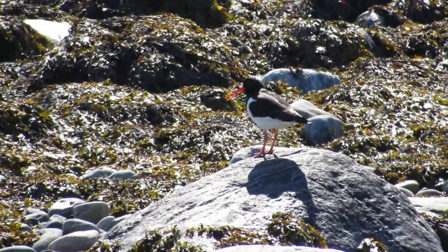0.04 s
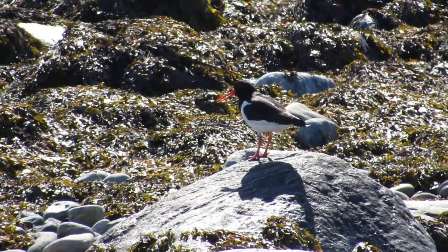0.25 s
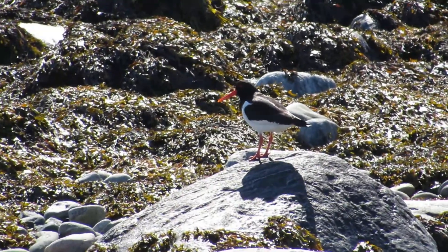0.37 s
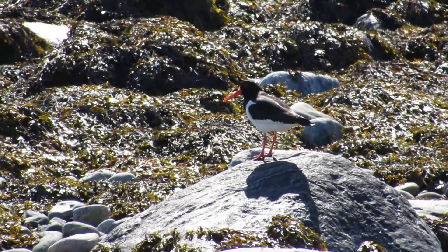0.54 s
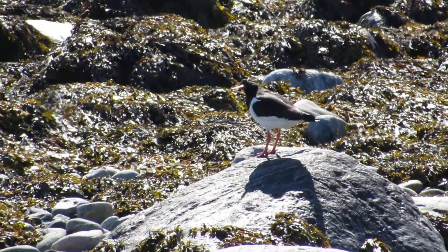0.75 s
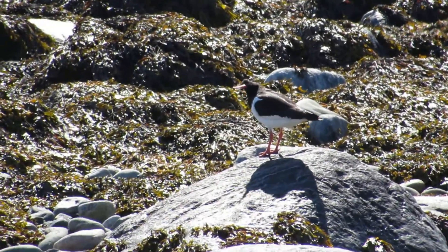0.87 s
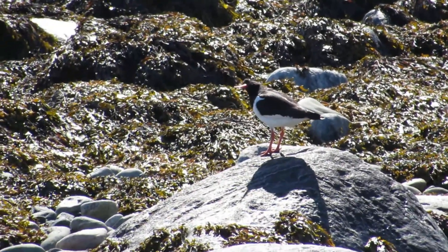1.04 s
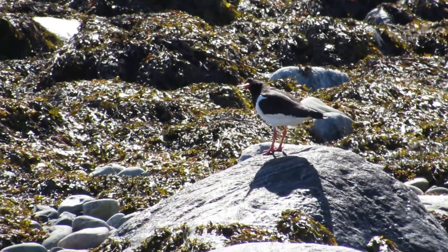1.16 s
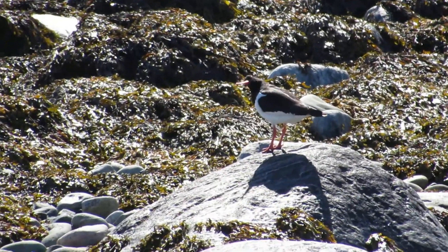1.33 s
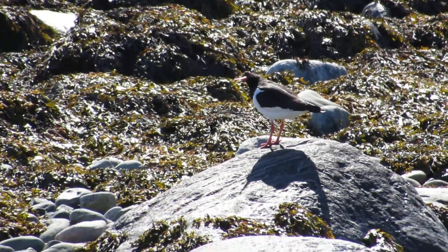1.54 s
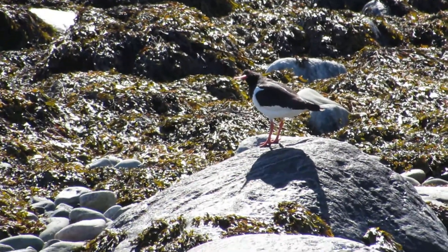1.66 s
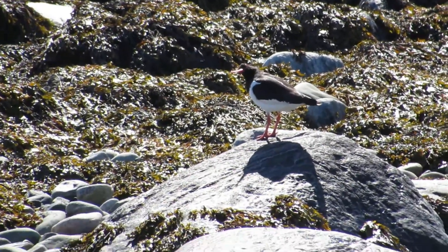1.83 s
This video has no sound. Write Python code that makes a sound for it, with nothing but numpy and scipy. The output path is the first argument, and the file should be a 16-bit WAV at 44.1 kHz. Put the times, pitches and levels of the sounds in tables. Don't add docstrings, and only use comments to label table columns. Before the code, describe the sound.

Over soft hissing surf and low uneven wind thumps on a camera's microphone pair, a nearby shorebird peeps once, bright and clear; afterwards only wash, small gurgles and drips among stones remain on the open rocky shore.

```python
import sys
import numpy as np
from scipy import signal
from scipy.fft import rfft, irfft
from scipy.io import wavfile
from scipy.ndimage import uniform_filter1d

SR = 44100
rng = np.random.default_rng(int(sys.argv[2]) if len(sys.argv) > 2 else 0)


def generate_wav(sig):
    pcm = np.round(np.clip(np.atleast_2d(sig).T, -1, 1) * 32767).astype(np.int16)
    wavfile.write(sys.argv[1], SR, pcm)


def voltage_ratio(level):
    return 10 ** (np.asarray(level, float) / 20)


N = 83790
SIDE = np.array([[.5], [-.5]])


def evened(x):
    return x / np.sqrt(np.mean(x ** 2) + 1e-20)


def steadied(x, seconds):
    size = round(seconds * SR)
    power = uniform_filter1d(uniform_filter1d(x ** 2, size), size)
    return x / np.sqrt(abs(power))


def read(points, hz):
    f, value = np.transpose(points)
    return np.interp(np.log(hz + 1), np.log(f + 1), value)


def drift(seconds, shape):
    size = max(round(seconds * SR), 1)
    noise = rng.standard_normal(shape)
    return evened(uniform_filter1d(uniform_filter1d(noise, size), size))


def coloured(x, gain):
    return irfft(rfft(x) * gain(np.fft.rfftfreq(N, 1 / SR)), N)


def bubble(hz, length, rise):
    u = np.arange(0, 1, 1 / (length * SR))
    cycles = hz * length * (u + (rise - 1) * u ** 2 / 2)
    swell_and_fade = np.sin(np.pi * u ** .6) ** 2
    return np.sin(2 * np.pi * cycles) * swell_and_fade


# (frequency [Hz], level per Hz [dB])
SURF_COLOUR = [(250, 0), (500, -4.5), (2650, -12), (4500, -16.5), (7000, -20.5), (11600, -27), (13600, -34),
               (15000, -42)]
# (time [s], level [dB])
SWELL = [
    (0.0, -58.5),
    (0.672, -52.5),
    (0.792, -50.5),
    (1.122, -49.5),
    (1.56, -53.5),
    (1.9, -53.5),
]
# (frequency [Hz], share [ratio])
SWELL_SHARE = [(300, 0.6), (800, 0.99), (2000, 1.0), (5000, 0.43), (12000, 0.18)]
# (frequency [Hz], correlation [-1 to 1])
LIKENESS = [(250, -0.79), (540, -0.68), (1100, -0.38), (2300, 0.049), (4800, 0.26), (7000, 0.068),
            (14500, -0.12)]
# (frequency [Hz], left-right difference [dB])
SURF_LEAN = [(60, -1.0), (150, -8), (370, -1.5), (930, 1.5), (2330, 4), (5810, -0.5), (14500, 1)]
# (centre [Hz], width [Hz], level [dB])
HOLLOWS = [(762, 118, -53), (932, 530, -54), (1730, 390, -60.5), (4980, 470, -71)]


def surf():
    surf_db, patch_db, flicker_db, hollow_steady_s = -45.5, 1.94, 0.38, 0.052
    frames, hz = N // 128 + 5, np.fft.rfftfreq(512, 1 / SR)
    hz[0] = 1
    a, b, c, d, e, f, patches, flicker = rng.standard_normal((frames, 257, 8)).T
    patches = evened(uniform_filter1d(uniform_filter1d(patches, 6, 0), 16, 1))
    flicker = evened(uniform_filter1d(flicker, 40, 0))
    s, db = np.transpose(SWELL)
    swell = np.interp(np.arange(frames) * 128 / SR, s, db - np.mean(db))
    field_db = read(SWELL_SHARE, hz)[:, None] * swell + patch_db * patches + flicker_db * flicker
    same = np.clip(read(LIKENESS, hz), -1, 1)[:, None]
    left = a + 1j * b
    right = same * left + np.sqrt(1 - same ** 2) * (c + 1j * d)
    spectra = np.array([left, right, e + 1j * f]) * voltage_ratio(field_db)
    left, right, centre = signal.istft(spectra, nperseg=512, noverlap=384)[1][:, :N]

    def wash(noise, side):
        def gain(f):
            low_cut = 1 + (200 / (f + 1)) ** 4
            return voltage_ratio(read(SURF_COLOUR, f) + side * read(SURF_LEAN, f)) / low_cut
        return coloured(noise, gain)

    wide = np.array([wash(left, .5), wash(right, -.5)])
    hollow = 0
    for centre_hz, width, db in HOLLOWS:
        ring = coloured(centre, lambda f: 1 / (1 + (2 * (f - centre_hz) / width) ** 2))
        hollow = hollow + voltage_ratio(db) * steadied(ring, hollow_steady_s)
    return voltage_ratio(surf_db) * evened(wide) + hollow


# (frequency [Hz], level per Hz [dB])
WIND_COLOUR = [(8.8, -53), (15, -6), (43, 0.5), (70, 2), (162, -12), (193, -11), (247, -19.5), (280, -22.5),
               (400, -34), (520, -72), (880, -120)]
# (time [s], level [dB])
GUSTS = [(0, -31.5), (.1, -39), (.19, -29.5), (.26, -32.5), (.33, -34.5), (.5, -31), (.58, -38.5),
         (.66, -33.5), (.79, -38), (.84, -40.5), (.96, -39.5), (1.01, -32.5), (1.11, -37), (1.18, -39.5),
         (1.44, -36), (1.64, -38.5), (1.72, -43.5), (1.9, -38.5)]


def wind():
    lumps_db, lump_s, steady_s = 1, 0.045, 0.057
    common_db, lean_db, lag_s = -14, -0.8, .00005
    s, db = np.transpose(GUSTS)
    noise = rng.standard_normal((2, N)) * voltage_ratio(lumps_db * drift(lump_s, N))
    noise = coloured(noise, lambda f: voltage_ratio(read(WIND_COLOUR, f)) / (1 + (f / 450) ** 4))
    strength = voltage_ratio(np.interp(np.arange(N) / SR, s, db))
    across, common = steadied(noise, steady_s) * strength
    common = voltage_ratio(common_db) * common
    left = np.roll(common + across, round(lag_s * SR))
    right = common - across
    return np.array([left, right]) * voltage_ratio(lean_db * SIDE)


# (time [s], level [dB], pitch [Hz], length [s], pitch rise [ratio])
DRIPS = [(.0325, -42, 5200, .0025, 1.01), (.169, -43, 5000, .005, 1.01), (.462, -46, 2150, .005, 1.1),
         (.6205, -35, 740, .014, 1.1), (.648, -46, 2300, .004, 1.05), (.648, -46, 5100, .002, 1.1),
         (.684, -39, 950, .012, 1.3), (.847, -42, 1050, .01, 1.1), (.887, -43, 2400, .002, 1.05),
         (.957, -47, 5200, .003, 1.01), (.978, -40, 1600, .002, 1.3), (1.009, -41, 2400, .003, 1.05),
         (1.032, -40, 860, .025, 1.08), (1.06, -53, 1500, .04, 1.25), (1.075, -46, 1060, .02, 1.02),
         (1.09, -37, 760, .04, .93), (1.115, -45, 1100, .02, 1.02), (1.3903, -28, 1750, .0026, .45),
         (1.3912, -41, 5400, .0018, 1.01), (1.3925, -35, 700, .01, .9), (1.389, -45, 330, .012, .9),
         (1.4515, -45, 4400, .004, 1.01), (1.475, -47, 4400, .005, 1.01)]


def trickle():
    fizz_per_s, fizz_db, fizz_spread_db = 880, -61, 7.5
    lean_db, lead_rad = 6.5, 0.73
    out = np.zeros(N)
    size = voltage_ratio(fizz_spread_db * np.minimum(rng.exponential(1, N), 4))
    size *= rng.random(N) < fizz_per_s / SR
    kind, shape = rng.integers(0, 24, N), rng.random((24, 2))
    for k, hz in enumerate(np.geomspace(850, 6000, 24)):
        length, rise = (4 + 8 * shape[k, 0]) / hz, 1 + 0.14 * shape[k, 1]
        grain = bubble(hz, length, rise) * (700 / hz) ** 0.32
        out += signal.oaconvolve(size * (kind == k), grain)[:N]
    out = voltage_ratio(fizz_db) * evened(out)
    for s, db, hz, length, rise in DRIPS:
        drop = voltage_ratio(db) * bubble(hz, length, rise)
        out[round(s * SR):][:len(drop)] += drop
    return (signal.hilbert(out) * voltage_ratio(lean_db * SIDE) * np.exp(1j * lead_rad * SIDE)).real


# (time [s], pitch [Hz], effort [dB], bill opening [dB])
CALL = [
    (.2312, 2696, -32, -27),
    (0.248, 2800, -36.5, -22.5),
    (0.259, 3055, -21, -1),
    (0.267, 3182, -20.5, -0.5),
    (.275, 3251, -19.5, -5),
    (.282, 3110, -19.5, -0.5),
    (0.291, 2845, -32, -6.5),
    (0.302, 2620, -34, -37),
    (.311, 2070, -44.5, -50),
]
# (multiple [ratio], level [dB], share of effort [ratio], share of opening [ratio],
# left-right difference [dB], left lead [rad])
PARTIALS = [(1, 0, 0.94, 0.0091, 4.5, .3), (2, -11.5, .05, 0.05, -0.5, 0.71), (3, -6, .02, 0.95, 4.5, 0.25),
            (4, -18, 2.1, 1.15, 4.5, 0.98)]
# (pitch [Hz], level [dB], length [s])
PUFF = [(293, -41, 0.0095), (594, -40, 0.0088), (1020, -29.5, 0.0025)]


def bird():
    top_db, shimmer_db, shimmer_s = -21, 1.1, 0.004
    onset_s, onset_hz, onset_db = 0.00256, 647, -14
    edge_db, edge_s = -35, 0.019
    close_at_s, close_db_per_s = 0.3034, -3400
    t = np.arange(N) / SR
    s, *columns = np.transpose(CALL)
    hz, effort, opening = (uniform_filter1d(np.interp(t, s, c), size=170) for c in columns)
    slide = np.clip((t - s[0]) / onset_s + 1, 0, 1)
    turn = 2 * np.pi * np.cumsum(onset_hz + (hz - onset_hz) * slide) / SR
    fade_in = np.minimum(slide * 4, 1) * voltage_ratio(onset_db * (1 - slide))
    fade_out = np.clip((s[-1] - t) / .003 + 1, 0, 1)
    choke_db = np.maximum(close_db_per_s * np.maximum(t - close_at_s, 0), -60)
    edge = voltage_ratio(top_db + edge_db - 9 * abs(t - s[0]) / edge_s)
    shimmer = drift(shimmer_s, (len(PARTIALS), 2, N))
    out = 0
    for (k, db, by_effort, by_opening, pan_db, lead), wobble in zip(PARTIALS, shimmer):
        level_db = top_db + db + by_effort * (effort - max(effort)) + by_opening * opening
        level_db = level_db + choke_db * (k > 1.5)
        strength = slide ** (4 * k - 4) * (voltage_ratio(level_db) + edge * (k > 3.5))
        balance = voltage_ratio(pan_db * SIDE + shimmer_db * wobble)
        out = out + strength * balance * np.sin(round(k) * turn + lead * SIDE)
    out = np.sqrt(2) * fade_in * fade_out * out
    for puff_hz, db, length in PUFF:
        puff = voltage_ratio(db) * bubble(puff_hz, length, 0.82)
        out[:, round((s[0] - onset_s) * SR):][:, :len(puff)] += puff
    return out


# (delay [s], level [dB])
ECHOES = [(.012, -35), (.024, -25), (.043, -28.5)]
# (frequency [Hz], level [dB])
ECHO_COLOUR = [(2000, 7), (3300, -4.5), (5500, 1.5), (9000, 2), (13000, 5)]


def rocks(call):
    scatter_db, t60_s, gap_s = -21, 0.2, 0.014
    t = np.arange(8000) / SR
    taps = rng.standard_normal((2, 8000)) * voltage_ratio(-60 * t / t60_s) * np.clip(t / gap_s, 0, 1)
    taps *= voltage_ratio(scatter_db) / np.linalg.norm(taps[0])
    for s, db in ECHOES:
        taps[:, round(s * SR)] += voltage_ratio(db)
    returned = signal.fftconvolve(call, taps, axes=1)[:, :N]
    return coloured(returned, lambda f: voltage_ratio(read(ECHO_COLOUR, f)))


def scene():
    call = bird()
    return surf() + wind() + trickle() + call + rocks(call)


def band_limit(x):
    return signal.sosfilt(signal.butter(12, 15110, fs=SR, output="sos"), x)


# (centre [Hz], width [Hz], leak [ratio])
NOTCHES = [(3930, 370, 0.087), (7770, 67, .07)]


def record(dry):
    whine_hz, whine_db, edge_hz = 13096, -82, 15000
    out = dry
    for hz, width, leak in NOTCHES:
        notched = signal.lfilter(*signal.iirnotch(hz, hz / width, SR), out)
        out = leak * out + (1 - leak) * notched
    whine = voltage_ratio(whine_db) * np.sin(2 * np.pi * whine_hz * np.arange(N) / SR)
    out = out + whine * np.array([[1], [.4]])
    out = coloured(out, lambda f: np.clip((edge_hz - f) / 150 + 1, 0, 1))
    return band_limit(out)


dry = scene()
out = record(dry)
generate_wav(out)
```